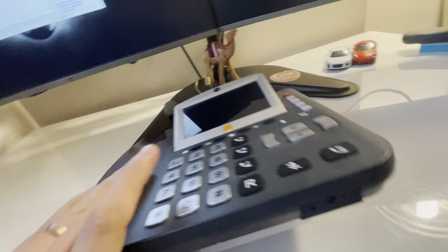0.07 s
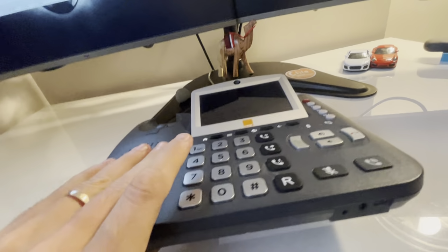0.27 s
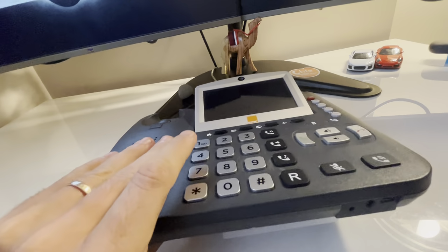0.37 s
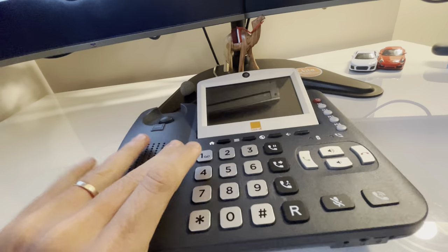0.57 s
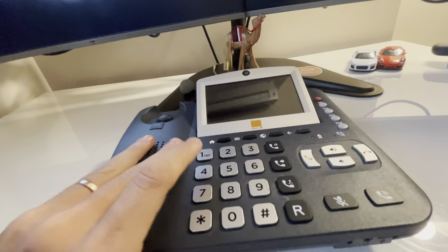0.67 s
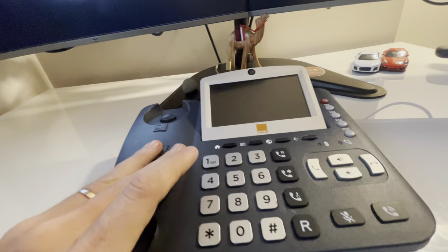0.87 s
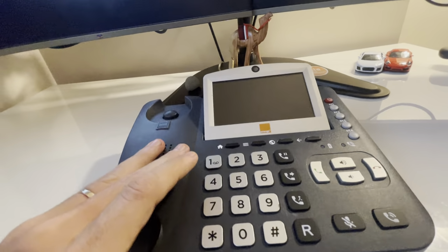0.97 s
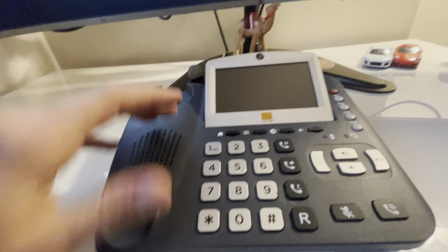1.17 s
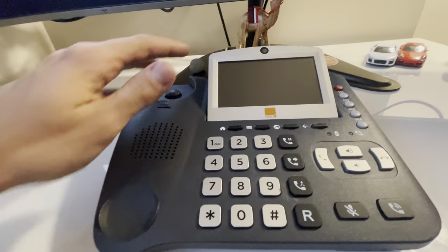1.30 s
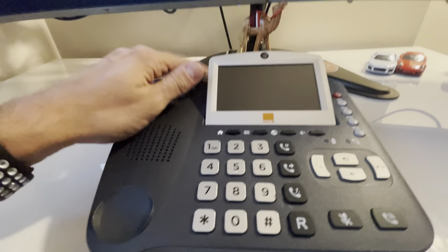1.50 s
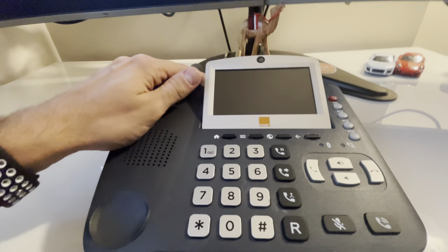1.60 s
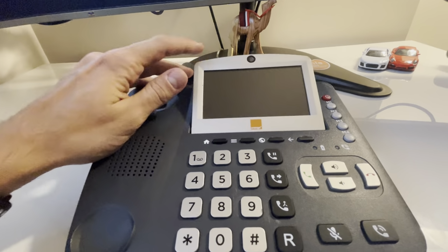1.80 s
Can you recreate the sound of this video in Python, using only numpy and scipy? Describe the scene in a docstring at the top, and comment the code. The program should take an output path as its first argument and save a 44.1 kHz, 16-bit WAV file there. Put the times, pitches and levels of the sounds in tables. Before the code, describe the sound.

A plastic desk phone is set down with two quick thumps, then nudged softly.

```python
"""A plastic desk phone is set down close by, in a small room with a quiet hum. One edge lands first,
then the whole base. Each landing knocks and clicks, makes the housing and desk top ring, shakes the
loose keys and echoes briefly. Next the phone is nudged into place: its feet drag, tick and squeak,
and soft bumps make the desk hum. Last, the hand slides off with a rustle and takes hold again."""
import sys
import numpy as np
from scipy import signal
from scipy.fft import rfft, irfft, next_fast_len
from scipy.io import wavfile
from scipy.ndimage import uniform_filter1d

SR = 44100
rng = np.random.default_rng(int(sys.argv[2]) if len(sys.argv) > 2 else 0)


def log_audio(samples):
    """Write samples as a 16-bit WAV file to the path given in sys.argv[1]."""
    # one column per channel
    frames = np.atleast_2d(samples).T
    # limit to full scale, then quantise
    limited = np.clip(frames, -1, 1)
    pcm = np.round(limited * 32767).astype(np.int16)
    wavfile.write(sys.argv[1], SR, pcm)


N = 81585

# A "fade time" is how long a sound takes to fall by 60 dB. A "colour" is its level at each frequency.
# steady low hum of the room (pitch [Hz], width [Hz], level [dB])
HUM_TONES = [(78, 10.01, -69.5), (195.26, 1.3, -68.5), (404, 25, -76)]
# colour of the room's soft noise (frequency [Hz], level [dB])
AIR_COLOUR = [(20, -9), (45, 1.5), (80, 2.5), (150, -4), (200, -12), (260, -6.5), (420, -11), (600, -12.5),
              (850, -10.5), (1200, -18.5), (1700, -23), (2300, -32), (4500, -32.5), (7000, -40),
              (9500, -37), (12000, -48), (15500, -54)]
# skin and sleeve brushing the phone throughout (time [s], level [dB])
RUSTLE_LEVELS = [(0, -77), (0.35, -70), (0.53, -62), (0.661, -62), (0.73, -59), (0.8, -68.5), (0.921, -61),
                 (1.052, -85.5), (1.18, -72), (1.28, -75), (1.43, -70.5), (1.55, -76.5), (1.7, -100),
                 (1.782, -84), (1.85, -94.5)]
# colour of that rustle (frequency [Hz], level [dB])
RUSTLE_COLOUR = [(100, -4.5), (400, -1.5), (900, 6.5), (1600, 0.5), (2400, -4.5), (4600, -7), (5700, -16),
                 (6500, -11), (7500, -24), (9500, -14.5), (11000, -20.5), (15500, -22)]
# hard hits of the feet and housing
# (time [s], knock level [dB], knock pitch [Hz], knock fade time [s], click level [dB])
CONTACTS = [(0.0575, -19.5, 1410, .014, -54.5), (0.0621, 0.5, 963, 0.01, -23),
            (0.0617, -11, 1540, .012, -26), (0.0643, 0.5, 710, .013, -27),
            (0.0655, -16, 2065, 0.011, -35.5), (0.0667, -30, 4750, 0.016, -32.5),
            (0.0813, -16.5, 375, 0.012, -45.5), (0.0845, -22.5, 1950, .012, -39),
            (0.0984, -15.5, 840, 0.02, -41), (0.1116, -27.5, 1830, .012, -46),
            (0.145, -29, 730, 0.015, -53), (0.2299, -10, 1320, 0.014, -10.5), (0.231, -1, 750, .013, -22),
            (0.2345, -5, 1340, 0.0097, -21), (0.2379, -4, 445, 0.015, -29.5),
            (0.2471, -6.5, 2300, .017, -19), (0.2499, -13.5, 475, 0.021, -42),
            (0.2522, -7, 820, 0.014, -28.5), (0.2632, -25.5, 2400, .012, -35.5),
            (0.522, -45, 728, 0.018, -49), (0.5563, -47, 1510, 0.014, -79), (0.5635, -68, 1450, .01, -43.5),
            (0.5688, -26.5, 770, 0.0071, -70), (0.683, -39.5, 1478, 0.025, -74.5),
            (0.7, -37.5, 2377, 0.027, -51), (1.538, -48, 792, .02, -86), (1.5533, -50.5, 424.7, .02, -65)]
# colour of the clicks (frequency [Hz], level [dB])
CLICK_COLOUR = [(200, -15.5), (700, -1), (1500, 5), (2500, -3.5), (3600, -7), (5200, -15), (6000, -15),
                (7300, -18), (8500, -12.5), (11000, -18), (15500, -25.5)]
# narrow bands that the hollow plastic housing makes louder (frequency [Hz], width [Hz], boost [dB])
HOUSING_PEAKS = [(1330, 90, 6), (1740, 57, 7), (2050, 90, 8), (2300, 310, 2.5), (2950, 350, 6),
                 (3860, 220, 4.5), (4460, 120, 7), (5040, 220, 7.5), (6250, 330, 4.5), (6620, 500, 5.5),
                 (8200, 650, 5.5), (9500, 250, 6.5)]
# early bounces of the clicks off desk, monitor and wall (left delay [s], right delay [s], level [dB])
BOUNCES = [(.0012, 0.0008, -13.5), (.0027, 0.0021, -12), (.0046, 0.0016, -10), (.0069, 0.014, -14)]
# the edge lands, then the base (time [s], level [dB])
LANDINGS = [(0.062, -23), (0.2333, -22.5)]
# ringing tones of housing and desk (pitch [Hz], edge level [dB], base level [dB], fade time [s])
RING_TONES = [(80, -4, -5, .33), (130.9, -1.5, 0.5, 0.38), (193, -9, 2, 0.32), (283.8, -2.5, -18, .41),
              (308.5, -17, -3.5, 0.27), (360, -18, 0, 0.35), (390, -2.5, -12, .16), (440, -3.5, -16.5, .14),
              (480, -9.5, -1.5, 0.23), (534.3, -2, 2, .2), (668, -6, -6, .16), (728, 2.5, -0.5, 0.19),
              (804.5, -1.5, 3, 0.2), (874, -1, -7, .12), (1008, 2.5, -6.5, 0.14), (1322, -15.5, -0.5, .15),
              (1765, -17, -6.5, .11), (2160, -14, -19, .11)]
# colour of the rattling keys (frequency [Hz], level [dB])
RATTLE_COLOUR = [(40, -6), (80, 0.5), (200, -5.5), (450, -2.5), (850, -2.5), (1500, -11), (2400, -16.5),
                 (3600, -26.5), (6500, -31), (10000, -35), (15500, -44.5)]
# how long the room echoes (frequency [Hz], fade time [s])
ECHO_FADES = [(100, .42), (300, 0.22), (800, 0.43), (2000, 0.52), (5000, .36), (9000, 0.59), (15000, 0.063)]
# colour of the echo of knocks and clicks (frequency [Hz], level [dB])
HIT_ECHO_COLOUR = [(100, -9.5), (400, 1), (800, -16.5), (1300, -14), (2500, -21), (6000, -6), (10000, -16),
                   (15000, -12)]
# colour of the echo of the ringing (frequency [Hz], level [dB])
RING_ECHO_COLOUR = [(100, -25), (200, -17.5), (400, -16), (900, -20.5), (2000, -18)]
# feet dragging over the desk (time [s], length [s], loudest point [share of length], level [dB])
DRAGS = [(0.348, 0.12, .5, -44.5), (0.569, 0.085, 0.53, -46.5), (0.664, 0.11, 0.38, -44),
         (1.53, 0.064, .35, -54)]
# colour of the dragging (frequency [Hz], level [dB])
DRAG_COLOUR = [(60, 8), (200, -1.5), (350, 1.5), (800, 0), (1500, -21.5), (3000, -21.5), (6000, -52),
               (11000, -35), (15500, -39.5)]
# soft bumps of hand and phone (time [s], level [dB], pitch [Hz], rise time [s], fade time [s])
BUMPS = [(0.614, -51.5, 63.2, 0.0064, 0.4), (0.728, -34.5, 127.1, 0.0051, 0.145),
         (1.013, -42.5, 80, 0.0058, 0.091), (1.157, -56, 56.9, 0.0084, 0.24),
         (1.552, -41, 60.6, 0.004, 0.14), (1.721, -46, 85.7, 0.007, 0.22)]
# sliding over plastic and desk
# (time [s], length [s], loudest point [share of length], level [dB], centre [Hz], width [Hz])
SLIDES = [(0.65, 0.26, 0.16, -56.5, 1525, 321), (0.862, 0.17, .12, -67.5, 8830, 3180),
          (0.902, .2, 0.52, -70.5, 4030, 1409), (1.33, 0.41, .4, -73.5, 3510, 1100),
          (1.415, 0.26, 0.6, -73, 4570, 910), (1.707, 0.18, 0.31, -70.5, 1493, 451.3)]
# a foot settling, then the new grip
# (time [s], length [s], level [dB], start pitch [Hz], end pitch [Hz], width [Hz])
SQUEAKS = [(0.725, .15, -58, 1540, 1630, 170), (1.522, .075, -68, 5500, 4850, 260)]
# how alike noise is on the left and right (frequency [Hz], likeness [0 unrelated to 1 the same])
LIKENESS = [(60, 1), (130, 0.6), (290, 0.9), (640, 0), (1400, 0.01), (15000, 0)]
# which side is louder (frequency [Hz], left minus right [dB])
BALANCE = [(60, -2.5), (200, -5), (700, -2.5), (1300, 1), (2300, -3.5), (4400, 5), (8000, -0.5),
           (12000, -2)]
# splits a difference between the channels: left row, right row (share [fraction])
SIDES = np.array([[.5], [-.5]])


def amp(db):
    """Turns decibels into a number to multiply by."""
    return 10 ** (np.asarray(db) / 20)


def unit(x):
    """Scales x to an average (rms) level of 1."""
    return x / np.sqrt(np.mean(x ** 2) + 1e-20)


def along(table, hz):
    """Reads between the rows of a (frequency, value) table, on a log frequency scale."""
    frequencies, values = np.transpose(table)
    return np.interp(np.log(hz + 1), np.log(frequencies + 1), values)


def since(start):
    """Seconds since the start, zero before it."""
    return np.maximum(np.arange(N) / SR - start, 0)


def fade(t, fade_s):
    """Falls by 60 dB every fade_s seconds."""
    return np.exp(-np.log(1000) * t / fade_s)


def struck(start, rise_s, fade_s):
    """The loudness of a blow: it rises quickly, then dies away."""
    t = since(start)
    return (1 - np.exp(-t / rise_s)) * fade(t, fade_s)


def struck_tone(start, hz, rise_s, fade_s):
    """One pure tone set ringing by a blow."""
    return struck(start, rise_s, fade_s) * np.sin(2 * np.pi * hz * since(start))


def stroke(start, length, peak):
    """The loudness of a rub: it swells to its peak (a share of its length) and lets go."""
    progress = since(start) / length
    ramp = np.minimum(progress / peak, (1 - progress) / (1 - peak))
    return np.sin(np.pi / 2 * np.clip(ramp, 0, 1))


def filtered(x, response):
    """Multiplies each frequency in x by response(frequency)."""
    size = next_fast_len(N + SR // 2)
    return irfft(rfft(x, size) * response(np.fft.rfftfreq(size, 1 / SR)), size)[..., :N]


def coloured(x, colour):
    """Gives x the colour in a table."""
    return filtered(x, lambda hz: amp(along(colour, hz)))


def coloured_after(x, gain_db):
    """Colours x by a dB curve so that it rings only after each hit, never before."""
    size = 2 * next_fast_len(N)
    cepstrum = irfft(np.log(amp(gain_db(np.fft.rfftfreq(size, 1 / SR)))), size)
    cepstrum[1:size // 2] *= 2  # move the early half of the ringing onto the late half
    cepstrum[size // 2 + 1:] = 0
    return irfft(rfft(x, size) * np.exp(rfft(cepstrum)), size)[..., :N]


def bell(f, hz, width):
    """A bell-shaped curve over the frequencies f, with its top at hz."""
    return 1 / (1 + ((f - hz) / (width / 2)) ** 2)


def band(x, hz, width):
    """Keeps one band of x, at level 1."""
    return unit(filtered(x, lambda f: bell(f, hz, width)))


def spread(pair):
    """Mixes two unrelated signals into a left and right that are alike in the bass."""
    angle = lambda hz: np.arccos(np.clip(along(LIKENESS, hz), -1, 1)) / 2
    mid, side = filtered(pair, lambda hz: np.array([np.cos(angle(hz)), np.sin(angle(hz))]))
    return np.array([mid + side, mid - side])


def hiss():
    """Plain stereo noise, equally strong at all frequencies."""
    return spread(rng.standard_normal((2, N)))


def noise(colour):
    """Coloured stereo noise at level 1."""
    return unit(coloured(hiss(), colour))


def background(air_db=-55, fall_db_per_s=2):
    """The room's wavering low hum, and soft noise that slowly gets quieter."""
    hum = sum(amp(db) * band(rng.standard_normal(N), hz, width) for hz, width, db in HUM_TONES)
    air = amp(air_db - fall_db_per_s * since(0)) * noise(AIR_COLOUR)
    return hum + air


def rustle():
    """Skin and sleeve brush lightly over the phone."""
    times, levels_db = np.transpose(RUSTLE_LEVELS)
    return amp(np.interp(since(0), times, levels_db)) * noise(RUSTLE_COLOUR)


def skin_grip(x, depth_db=3.5):
    """Skin grips and lets go: patches of x, about 700 Hz wide and 20 ms long, swell and sink."""
    spectrum = signal.stft(x, nperseg=256)[2]
    patches = uniform_filter1d(rng.standard_normal(spectrum.shape[1:]), size=4, axis=0)
    patches = uniform_filter1d(patches, size=7, axis=1)
    return signal.istft(spectrum * amp(depth_db * unit(patches)), nperseg=256)[1][:, :N]


def knocks(rise_s=0.00045):
    """Each hard contact knocks a very short tone out of the housing."""
    return -sum(amp(db) * struck_tone(start, hz, rise_s, fade_s)
                for start, db, hz, fade_s, _ in CONTACTS)


def clicks(snap_db=20, crackle_db=6):
    """Each hard contact also makes a sharp snap and a short crackle in the plastic."""
    snaps, crackle_level = np.zeros(N), np.zeros(N)
    for start, *_, db in CONTACTS:
        snaps[round(start * SR)] += amp(db + snap_db)
        crackle_level += amp(db + crackle_db) * struck(start, rise_s=0.00014, fade_s=0.0095)
    return housing(coloured_after(snaps + crackle_level * hiss(), lambda hz: along(CLICK_COLOUR, hz)))


def housing(x, lift_db=1):
    """The hollow housing boosts the narrow bands it likes to ring in."""
    boost_db = lambda f: lift_db + sum(db * bell(f, hz, width) for hz, width, db in HOUSING_PEAKS)
    return coloured_after(x, boost_db)


def with_bounces(x):
    """Nearby surfaces add quieter copies of x, with a different delay on each side."""
    delay = lambda hz, left, right: np.exp(-2j * np.pi * hz * np.array([[left], [right]]))
    return filtered(x, lambda hz: 1 + sum(amp(db) * delay(hz, left, right) for left, right, db in BOUNCES))


def echo(x, colour):
    """The small room answers x with a blur of echoes; each frequency dies at its own speed."""
    hz, t, spectrum = signal.stft(rng.standard_normal((2, N)), SR, nperseg=256)
    spectrum *= fade(t, along(ECHO_FADES, hz)[:, None])
    tail = signal.istft(spectrum, SR, nperseg=256)[1][:, :N]
    build_up = 1 - np.exp(-since(0.00081) / 0.00073)
    tail = spread(tail * build_up)
    tail /= np.linalg.norm(tail[0])
    answer = signal.fftconvolve(np.broadcast_to(x, (2, N)), tail, axes=1)[:, :N]
    return coloured(answer, colour)


def ringing(rise_cycles=0.8):
    """Both landings ring the same tones; where the phone touches sets how strong each one is."""
    out = np.zeros(N)
    for landing, (start, db) in enumerate(LANDINGS):
        for row, (hz, *levels_db, fade_s) in enumerate(RING_TONES):
            tone = struck_tone(start, hz, rise_cycles / hz, fade_s)
            out -= (-1) ** row * amp(db + levels_db[landing]) * tone  # neighbours swing opposite ways
    return out


def desk_boom(hz=119.8, beat_hz=3.06, edge_db=-38, base_db=-11):
    """Two close tones of the desk top beat together, so its boom fades, dips and returns faintly."""
    out = np.zeros(N)
    for (start, _), db in zip(LANDINGS, (edge_db, base_db)):
        beat = np.cos(np.pi * beat_hz * since(start))
        out -= amp(db) * beat * struck_tone(start, hz, rise_s=0.012, fade_s=0.48)
    return out


def key_rattle(edge_db=-26, base_db=-20):
    """Keys and loose plastic shake after each landing, heard as a fading burst of noise."""
    shake = sum(amp(db) * struck(start, rise_s=0.006, fade_s=0.23)
                for (start, _), db in zip(LANDINGS, (edge_db, base_db)))
    return housing(shake * noise(RATTLE_COLOUR))


def foot_drags():
    """The phone's feet drag over the desk with a dull scrape."""
    level = sum(amp(db) * stroke(start, length, peak) for start, length, peak, db in DRAGS)
    return level * noise(DRAG_COLOUR)


def bumps():
    """Soft pushes make the desk top hum."""
    return sum(amp(db) * struck_tone(start, hz, rise_s, fade_s) for start, db, hz, rise_s, fade_s in BUMPS)


def slides():
    """Each slide over plastic or desk makes a thin band of hiss."""
    return sum(amp(db) * stroke(start, length, peak) * band(hiss(), hz, width)
               for start, length, peak, db, hz, width in SLIDES)


def squeaks():
    """Sticking and slipping makes a thin, wavering tone that glides in pitch."""
    out = np.zeros((2, N))
    for start, length, db, from_hz, to_hz, width in SQUEAKS:
        hz = np.interp(since(start), [0, length], [from_hz, to_hz])
        tone = np.sin(2 * np.pi * np.cumsum(hz) / SR)
        waver = band(rng.standard_normal((2, N)), 0, width)
        out += amp(db) * stroke(start, length, peak=0.53) * unit(waver * tone)
    return out


def placed(x, left_lead_s=0.00017):
    """Most frequencies are louder on the right, and all arrive a little earlier on the left."""
    balance = lambda hz: amp(SIDES * along(BALANCE, hz))
    return filtered(x, lambda hz: balance(hz) * np.exp(2j * np.pi * hz * SIDES * left_lead_s))


def scene():
    """Phone, desk, hand and room together; the hits and ringing sit further right than their echo."""
    hits = knocks() + with_bounces(clicks())
    ring = ringing()
    direct = (hits + ring) * amp(-2.5 * SIDES)  # tilted 2.5 dB to the right
    echoes = echo(hits, HIT_ECHO_COLOUR) + echo(ring, RING_ECHO_COLOUR)
    handling = skin_grip(rustle() + slides()) + foot_drags() + bumps() + squeaks()
    return placed(background() + direct + echoes + desk_boom() + key_rattle() + handling)


def record(dry, low_cut_hz=40, peak_limit=0.78, top_hz=16400):
    """The microphone drops the deepest bass, rounds off the peaks and cuts the highest treble."""
    thinned = signal.sosfilt(signal.butter(2, low_cut_hz, "high", fs=SR, output="sos"), dry)
    rounded = thinned / (1 + np.abs(thinned / peak_limit) ** 6) ** (1 / 6)
    return filtered(rounded, lambda hz: hz < top_hz)


dry = scene()
out = record(dry)
log_audio(out)
```